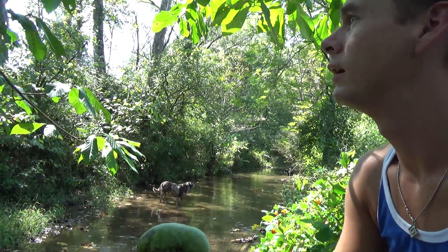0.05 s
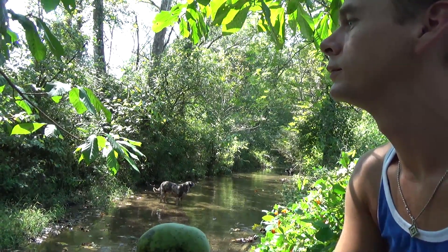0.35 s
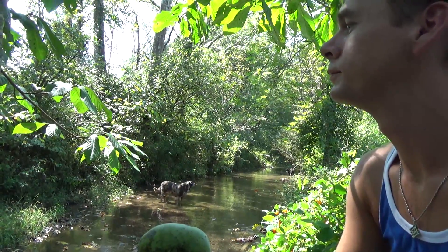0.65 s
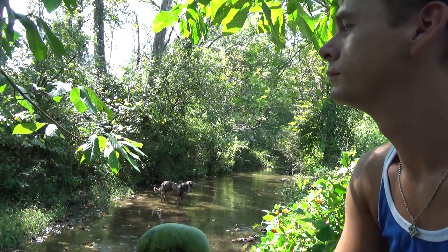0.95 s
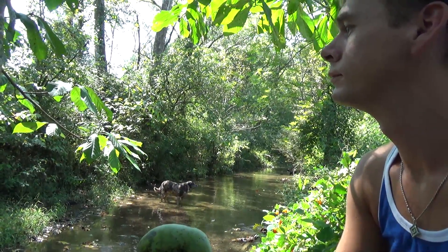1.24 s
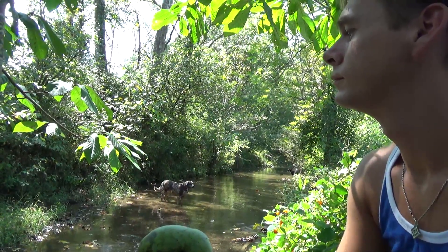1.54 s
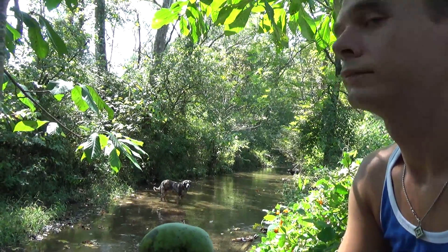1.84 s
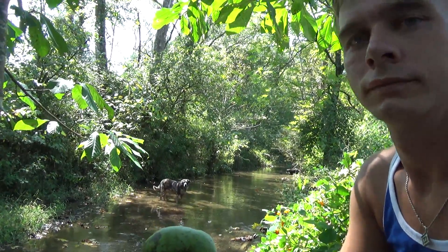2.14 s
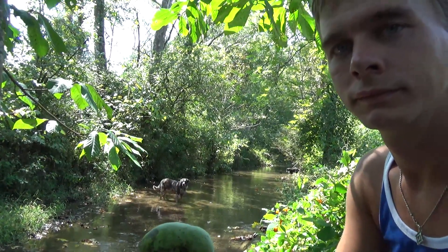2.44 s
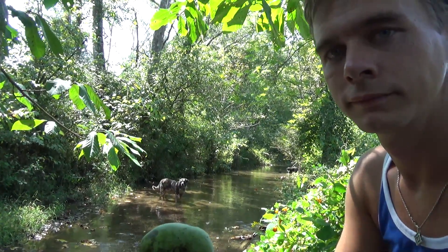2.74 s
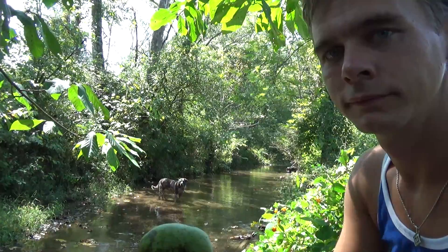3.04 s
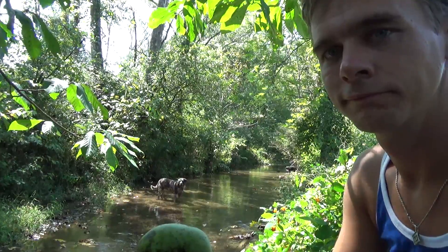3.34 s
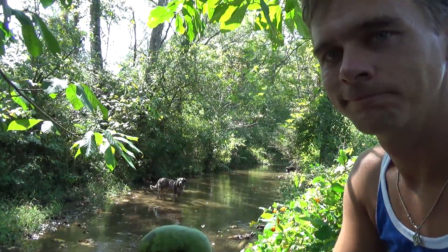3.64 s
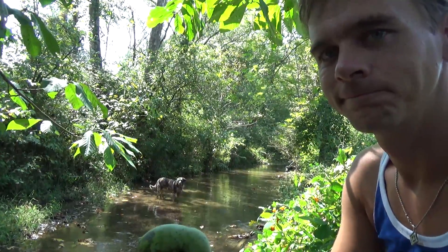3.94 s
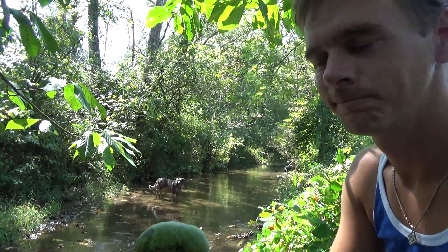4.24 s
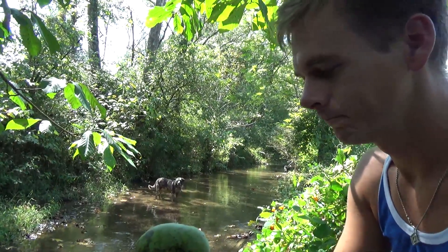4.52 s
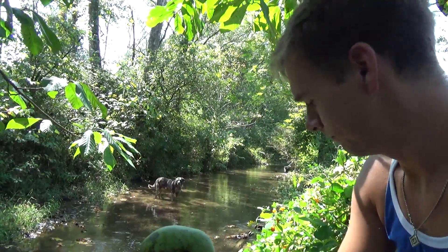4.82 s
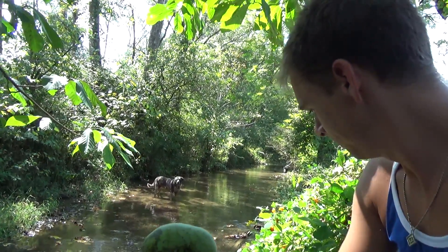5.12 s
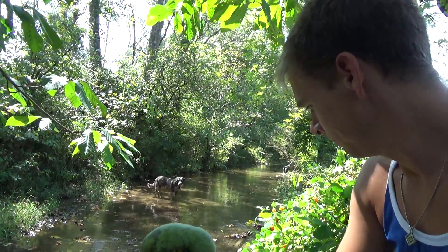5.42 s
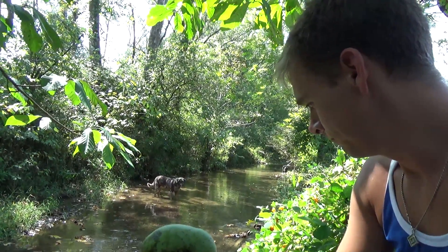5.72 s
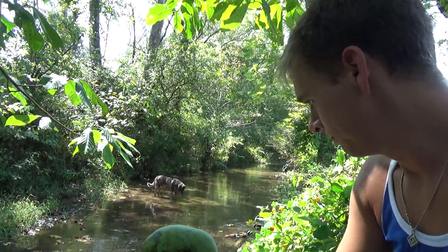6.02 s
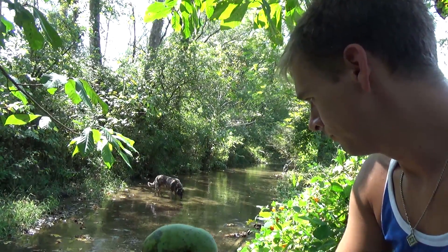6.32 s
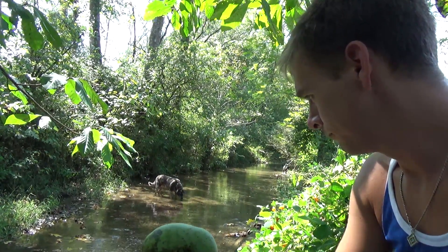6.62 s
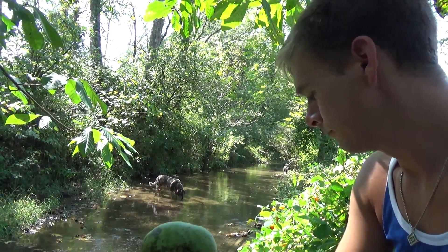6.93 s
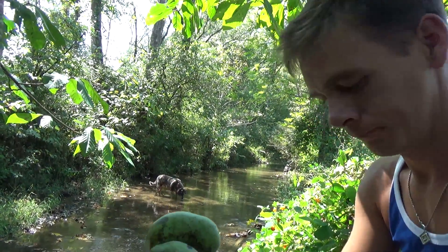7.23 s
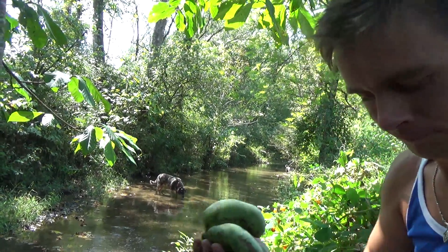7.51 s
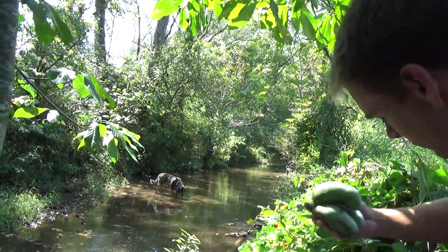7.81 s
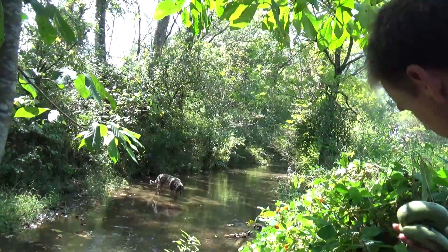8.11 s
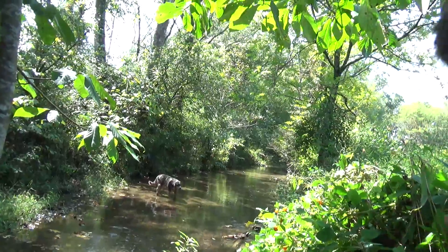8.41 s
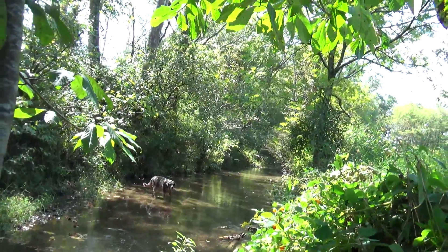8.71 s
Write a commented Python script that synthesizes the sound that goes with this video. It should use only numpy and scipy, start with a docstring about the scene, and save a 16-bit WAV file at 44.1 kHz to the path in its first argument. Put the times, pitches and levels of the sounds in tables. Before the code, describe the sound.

High-pitched insects drone in summer woods while a nearby katydid buzzes, leaves rustle, water plips softly and something knocks once.

```python
"""A meadow katydid close to the microphone, by a wooded creek in summer. Rubbing its wings, it sings
five ticks and a fluttering buzz, four times over. Behind it, ground crickets and far katydids merge
into a high, steady drone above a wash of leaves and slow water. Leaves rustle, twigs snap and a
wading animal makes small plips. Late on, a faint trill rattles far off in the trees, and near the
end comes a sharp, briefly ringing knock close by, like a dropped twig or fruit."""
import sys
import numpy as np
from scipy import signal
from scipy.fft import rfft, irfft, next_fast_len
from scipy.io import wavfile

SR = 44100
rng = np.random.default_rng(int(sys.argv[2]) if len(sys.argv) > 2 else 0)


def dump_mix(stems):
    """Bounce the given channels to the path in sys.argv[1] as a 16-bit WAV at rate SR."""
    frames = np.atleast_2d(stems).T  # one column per channel
    limited = np.clip(frames, -1, 1)  # hard clip at full scale
    pcm = np.round(limited * 32767).astype(np.int16)
    wavfile.write(sys.argv[1], SR, pcm)


N = 390726


def from_db(db):
    """Decibels to gain."""
    return 10 ** (np.asarray(db) / 20)


def unit_rms(x):
    """Scale to unit power."""
    return x / np.sqrt(np.mean(x ** 2) + 1e-20)


def seconds():
    """The time of every sample."""
    return np.arange(N) / SR


def gain_curve(rows):
    """Gain that follows rows of time in seconds and level in dB."""
    return from_db(np.interp(seconds(), *np.transpose(rows)))


def held(start, end, attack_s, release_s):
    """Envelope that rises, holds at 1 and falls."""
    t = seconds()
    return np.clip(np.minimum((t - start) / attack_s, (end - t) / release_s), 0, 1)


def at_hz(points, hz):
    """Read a table on a log-frequency axis."""
    knots, values = np.transpose(points)
    return np.interp(np.log(hz + 1), np.log(knots), values)


def drift(per_s):
    """A random wander with a spread of about 1."""
    steps = rng.standard_normal(4000)
    return np.interp(seconds() * per_s, np.arange(len(steps)), steps) * np.sqrt(3 / 2)


def strokes(per_s, duty):
    """One smooth swell a cycle, as for each closing of the wings."""
    cycle = (np.cumsum(per_s) / SR + rng.random()) % 1
    return np.sin(np.pi * np.minimum(cycle / duty, 1))


def stereo_noise(colour, likeness):
    """Coloured noise; left-right likeness is a number or a table by frequency."""
    size = next_fast_len(N)
    hz = np.fft.rfftfreq(size, 1 / SR)
    alike = np.clip(likeness if np.isscalar(likeness) else at_hz(likeness, hz), 0, 1)
    mid, side = rfft(rng.standard_normal((2, size)))
    spectra = np.sqrt(1 + alike) * mid + np.sqrt(1 - alike) * side * [[1], [-1]]
    return unit_rms(irfft(spectra * from_db(at_hz(colour, hz)), size)[:, :N])


def pan(x, right_db):
    """Make the right side louder than the left by right_db."""
    return x * from_db(np.array([[-.5], [.5]]) * right_db)


def foliage(x, t60, wet_db):
    """Leaves and trunks scatter a short, diffuse tail, different at each side."""
    t = np.arange(SR // 2) / SR
    tail = rng.standard_normal((2, len(t))) * from_db(-60 * t / t60)
    tail /= np.sqrt(np.sum(tail ** 2, axis=1, keepdims=True))
    return x + from_db(wet_db) * signal.fftconvolve(np.atleast_2d(x), tail, axes=1)[:, :N]


# Katydids heard from far off. Each row: frequency in Hz, relative spectral level in dB.
FAR_COLOUR = [(5500, -43), (7500, -7.5), (8700, -3), (9500, 1), (10300, 2), (11000, -1), (12000, -2.5),
              (13000, -10), (14000, -12.5), (15800, -17.5)]
# Their long buzzes. Each row: start and end in seconds, relative level in dB.
FAR_BUZZES = [(-.3, .8, -51), (.55, 1.984, -46.5), (2.2, 4.9, -48), (5.0, 7.6, -47), (7.8, 9.102, -46.5)]

def far_katydids(hiss_db=-49, fade_s=.33, gain_db=2.5, flutter_db=.5):
    """Many distant buzzes blur into a hiss; a few stand out as they come and go."""
    buzzes = sum(from_db(db) * held(start, end, fade_s, fade_s) for start, end, db in FAR_BUZZES)
    envelope = np.hypot(from_db(hiss_db), buzzes)
    return stereo_noise(FAR_COLOUR, likeness=.92) * envelope * from_db(gain_db + flutter_db * drift(40))


# The cricket chorus, a little to the left. Each row: frequency in Hz, relative spectral level in dB.
CHORUS_COLOUR = [(5600, -46), (6400, -20.5), (6750, -12), (7000, -5), (7250, -1), (7550, -0.5),
                 (8000, -0.5), (8300, -3.5), (8700, -8.5), (9600, -42)]

def cricket_chorus(start_db=-46, rise_db_per_s=.12, shimmer_db=.88):
    """Countless trills overlap around the pitch of the wings and slowly grow louder."""
    db = start_db + rise_db_per_s * seconds() + shimmer_db * drift(25)
    return pan(stereo_noise(CHORUS_COLOUR, likeness=.82), right_db=-1) * from_db(db)


# The crickets nearest the microphone. Each row: pitch in Hz, strokes per second, relative level in dB.
CRICKETS = [(7178, 14.3, -60), (6990, 28.5, -66), (7385, 62, -62), (7650, 57, -63), (7860, 35, -64),
            (8020, 44, -62)]
# How hard they sing. Each row: time in seconds, gain in dB.
CRICKET_EFFORT = [(2.2, -2), (4.5, 1), (7.7, 3), (8.8, -4)]

def near_crickets(duty=.64, waver_hz=34, rate_spread=.0158):
    """Each stroke rings the wing at one slightly wavering pitch."""
    out = np.zeros(N)
    for hz, per_s, db in CRICKETS:
        tone = np.sin(2 * np.pi * np.cumsum(hz + waver_hz * drift(110)) / SR)
        gain = from_db(db + 2 * drift(3.2))
        stroke_rate = per_s * (1 + rate_spread * drift(2.03))
        out += gain * unit_rms(tone * strokes(stroke_rate, duty))
    return foliage(out * gain_curve(CRICKET_EFFORT), t60=.32, wet_db=-3.5)


# The woodland all around. Each row: frequency in Hz, relative spectral level in dB.
AIR_COLOUR = [(20, -12), (60, -14), (120, -9.5), (230, -4), (400, 1), (560, 1), (670, 5.5), (780, 3),
              (1000, 3.5), (1400, 1), (2400, 1), (4500, -4), (7000, -4.5), (16000, -26)]
# Its width at the microphone. Each row: frequency in Hz, left-right likeness from 0 to 1.
AIR_LIKENESS = [(60, 0.55), (200, 0.77), (500, 0.41), (1000, 0.24), (2000, 0.41), (4000, 0.8), (8000, 0.97)]
# Its slow swell. Each row: time in seconds, relative level in dB.
AIR_LEVEL = [(0, -60.5), (1.2, -59), (7.1, -58.5), (7.8, -56.5), (8.5, -58)]

def woodland_air(gain_db=2):
    """The soft, even wash of leaves and slow water."""
    return stereo_noise(AIR_COLOUR, AIR_LIKENESS) * gain_curve(AIR_LEVEL) * from_db(gain_db)


# Leaves close by, crackling or brushed. Each row: frequency in Hz, relative spectral level in dB.
LEAF_COLOUR = [(200, -25), (700, 4.5), (1500, -1), (3000, 2.5), (5000, 3), (7000, 5.5), (15000, -57)]
# Stirring in the dry undergrowth. Each row: time in seconds, crackles per second.
STIRRING = [(3.2, 4), (4.0, 45), (5.0, 3), (7.0, 35)]

def undergrowth(crackle_db=-63, spread_db=2, decay_s=.007):
    """Dry leaves and twigs give way at random, each with a tiny burst."""
    onsets = rng.random(N) < np.interp(seconds(), *np.transpose(STIRRING)) / SR
    db = crackle_db + spread_db * np.clip(rng.standard_normal(N), -2, 2)
    onset_power = onsets * from_db(db) ** 2
    dying_power = signal.lfilter([1], [1, -np.exp(-2 / (decay_s * SR))], onset_power + 1e-18)
    return stereo_noise(LEAF_COLOUR, likeness=1) * np.sqrt(dying_power)


# The near katydid's resonant wing membrane. Each row: frequency in Hz, relative spectral level in dB.
WING_COLOUR = [(7000, -36), (8800, -12), (9900, -12), (10800, -5.5), (11250, 2), (11500, -3.5), (11750, -1),
               (12050, -2.5), (12550, 0), (12800, -11), (13050, -3), (13500, -10.5), (14600, -16.5),
               (15800, -28)]
# Its songs, just right of centre. Each row: first tick and tick spacing in seconds, relative tick level
# in dB, buzz start and end in seconds, relative mid-buzz level in dB, swell in dB per second,
# release in seconds.
SONGS = [(.163, .054, -43, .48, 1.88, -45, -1.8, .2), (2.295, .058, -47, 2.58, 3.77, -47.5, 2, .06),
         (4.303, .057, -43.5, 4.6, 6.25, -46.2, 0, .07), (6.82, .06, -43, 7.05, 8.515, -45, 3, .02)]
# The last buzz surges twice. Each row: time in seconds, gain in dB.
SURGES = [(7.4, 0), (7.63, 4.5), (8.0, -1), (8.48, 3)]

def near_katydid(stroke_hz=52.4, slowing_hz_per_s=.79, attack_s=.15, tick_s=.014, tick_gain_db=-2):
    """A file rasps over the wing membrane: single strokes tick, fast ones buzz and gradually slow."""
    t = seconds()
    effort, rate, ticks = np.zeros(N), np.full(N, stroke_hz), np.zeros(N)
    age = t[:SR // 5] / tick_s
    tick = np.sqrt(2 * age) * np.exp(.5 - age)
    for first, spacing, tick_db, start, end, buzz_db, swell_db_per_s, release_s in SONGS:
        for k in range(5):
            at = round((first + k * spacing - tick_s / 2) * SR)
            ticks[at:at + len(tick)] += from_db(tick_db + tick_gain_db) * tick
        swell_db = swell_db_per_s * (t - (start + end) / 2)
        effort += from_db(buzz_db + swell_db) * held(start, end, attack_s, release_s)
        rate = np.where(t > start, stroke_hz - slowing_hz_per_s * (t - start), rate)
    closing = strokes(rate, duty=.97) ** 2
    flutter = unit_rms(np.hypot(closing, .37))   # the wings rasp softly on opening too
    buzz = effort * gain_curve(SURGES) * flutter
    return pan(stereo_noise(WING_COLOUR, likeness=.96) * np.hypot(buzz, ticks), right_db=1.5)


# Brushing through nearby leaves. Each row: centre time and length in seconds, level in dB.
RUSTLES = [(1.49, .12, -62), (3.66, .15, -63), (4.218, 0.09, -57), (4.552, .12, -60.5),
           (5.57, 0.054, -55.5), (6.51, 0.094, -59.5), (7.103, 0.2, -58), (7.405, .045, -52.5),
           (7.724, 0.34, -60), (8.462, 0.092, -57), (8.592, 0.36, -57), (8.843, 0.12, -56.5)]

def rustles(grain_db=4):
    """Leaves slide past each other in short, grainy swells."""
    t = seconds()
    swells = sum(from_db(db) * np.exp(-2 * ((t - centre) / length) ** 2) for centre, length, db in RUSTLES)
    return stereo_noise(LEAF_COLOUR, likeness=.97) * swells * from_db(grain_db * drift(250))


# Twigs breaking close by. Each row: start in seconds, level in dB, centre of the crack in Hz.
SNAPS = [(1.503, -49.5, 3800), (3.686, -52, 2600), (3.895, -53, 3500), (4.323, -49.5, 3800),
         (4.381, -43.5, 6330), (5.554, -41, 2920), (7.389, -48, 1600), (7.569, -45, 6000),
         (7.765, -46, 5400)]

def twigs(decay_s=.0099, attack_s=.001, band_ratio=1.49):
    """Each snap is a sudden, broad crack of noise that dies quickly."""
    out, t = np.zeros(N + SR), np.arange(SR // 10) / SR
    envelope = np.exp(-t / decay_s) * np.minimum(t / attack_s, 1)
    for start, db, hz in SNAPS:
        band = signal.butter(2, [hz / band_ratio, hz * band_ratio], "band", fs=SR, output="sos")
        crack = unit_rms(signal.sosfilt(band, rng.standard_normal(len(t))))
        at = round(start * SR)
        out[at:at + len(t)] += from_db(db) * crack * envelope
    return foliage(out[:N], t60=.2, wet_db=-8)


def pops(rows, decay_s, attack_s, noise_gain, rise):
    """Short rings, each in an octave of noise; a positive rise glides the ring up as it dies."""
    out, t = np.zeros(N + SR), np.arange(SR // 10) / SR
    envelope = np.exp(-t / decay_s) * np.minimum(t / attack_s, 1)
    for start, db, hz in rows:
        ring = np.sin(2 * np.pi * hz * (t + rise * t ** 2))
        octave = signal.butter(2, [hz / np.sqrt(2), hz * np.sqrt(2)], "band", fs=SR, output="sos")
        noise = unit_rms(signal.sosfilt(octave, rng.standard_normal(len(t))))
        at = round(start * SR)
        out[at:at + len(t)] += from_db(db) * (ring + noise_gain * noise) * envelope
    return out[:N]


# Plips in the creek's shallows. Each row: start in seconds, relative level in dB, pitch in Hz.
PLIPS = [(1.814, -46, 2200), (5.75, -44.5, 2720), (6.668, -42.5, 2220), (6.763, -37.5, 2080),
         (6.853, -34, 2390), (7.044, -37, 1200), (7.096, -41.5, 2680), (7.157, -40, 2970),
         (7.17, -42, 2940), (7.609, -38, 1193), (7.622, -34.5, 2225), (7.696, -42, 1190),
         (7.876, -39.5, 2930), (7.894, -38.5, 2070), (7.938, -40.5, 2330), (8.337, -42, 2610),
         (8.82, -40.5, 2160)]

def wading(plip_gain_db=-3, slap_gain_db=-11):
    """An animal stirs up bright plips, each with a duller slap an octave below; the banks scatter them."""
    plips = [(start, db + plip_gain_db, hz) for start, db, hz in PLIPS] + faint_splashes()
    slaps = [(start, db + slap_gain_db, hz / 2) for start, db, hz in plips]
    water = pops(plips + slaps, decay_s=.0058, attack_s=.0025, noise_gain=.83, rise=1.6)
    return foliage(water, t60=.22, wet_db=-7)


def faint_splashes(count=12, start_s=5.4, end_s=8.0, db=-52.5, low_hz=877, high_hz=2820):
    """Rows of faint plips at random moments and pitches while the animal wades."""
    return [(start_s + when * (end_s - start_s), db, low_hz * (high_hz / low_hz) ** pitch)
            for when, pitch in rng.random((count, 2))]


# A trill far off in the trees. Each row: frequency in Hz, relative spectral level in dB.
TRILL_COLOUR = [(1200, -28), (2200, -14), (2750, -0.5), (3150, -2), (3700, -9), (5000, -21)]

def far_trill(start_s=5.68, end_s=8.35, fade_s=.076, notes_per_s=30.0, db=-64.5, sag_db_per_s=1):
    """A rapid rattle of hoarse notes, slowly fading and blurred by the trees."""
    notes = stereo_noise(TRILL_COLOUR, likeness=1) * unit_rms(strokes(np.full(N, notes_per_s), duty=.86))
    effort = from_db(db - sag_db_per_s * (seconds() - start_s))
    return foliage(notes * effort * held(start_s, end_s, fade_s, fade_s), t60=.28, wet_db=-3)


# Handling noise at the microphone. Each row: start in seconds, level in dB, pitch in Hz.
BUMPS = [(6.807, -51.5, 393), (7.128, -50, 377), (7.697, -62, 342)]

def handling_bumps():
    """Each bump is a dull, brief ring at one low pitch."""
    return pops(BUMPS, decay_s=.0081, attack_s=.0016, noise_gain=.74, rise=0)


# The brief ring of a knock close by. Each row: frequency in Hz, relative level in dB,
# seconds to die by 60 dB, lean to the left in dB.
KNOCK_MODES = [(162, -29, 0.14, 2), (254, -25, 0.085, 4.5), (413, -19, 0.09, 8), (520, -17, 0.056, 1),
               (707, -8.5, 0.079, 16), (783, -8, 0.041, 1), (847, -7.5, 0.052, 2.5), (1040, -2, 0.031, 1),
               (1150, -21, 0.03, 8), (1440, -5, 0.027, 6), (1575, -12, 0.043, 5), (1700, -9, 0.052, 3),
               (1990, -19, 0.078, 7), (2240, -14, 0.054, 6), (2550, -17, 0.033, 16), (4530, -6, .015, 0)]
# The quick contacts that make up the knock. Each row: time in seconds, relative strength in dB.
CONTACTS = [(8.7105, -43), (8.7139, -23), (8.7163, -26), (8.7182, -42), (8.723, -35.5)]

def close_knock(skew_hz=1600, contact_hz=2100):
    """Quick contacts ring briefly, like a dropped twig or fruit; high modes are out of step left to right."""
    t = np.arange(SR // 4) / SR
    ring, blows = 0, np.zeros(N)
    for hz, db, t60, left_db in KNOCK_MODES:
        phase_skew = np.minimum((hz / skew_hz) ** 2, 1) * np.array([[.65], [-.65]])
        mode = np.cos(2 * np.pi * hz * t + phase_skew) * from_db(db - 60 * t / t60)
        ring = ring + pan(mode, right_db=-left_db)
    for start, db in CONTACTS:
        blows[round(start * SR)] += from_db(db)
    softening = signal.butter(2, [50, contact_hz], "band", fs=SR)   # a soft contact has little treble
    blows = signal.lfilter(*softening, blows)
    knock = signal.fftconvolve(blows[None], ring, axes=1)[:, :N]
    return foliage(knock, t60=.05, wet_db=-16)


def scene():
    """Insects all around the creek, small movements close to the microphone."""
    insects = near_katydid() + far_katydids() + cricket_chorus() + near_crickets()
    background = far_trill() + woodland_air()
    movements = wading() + handling_bumps() + twigs() + undergrowth() + rustles() + close_knock()
    return insects + background + movements


def record(dry, cutoff_hz=15800):
    """The highest treble is cut steeply."""
    return signal.sosfilt(signal.ellip(12, .1, 80, cutoff_hz, fs=SR, output="sos"), dry)


dry = scene()
out = record(dry)
dump_mix(out)
```